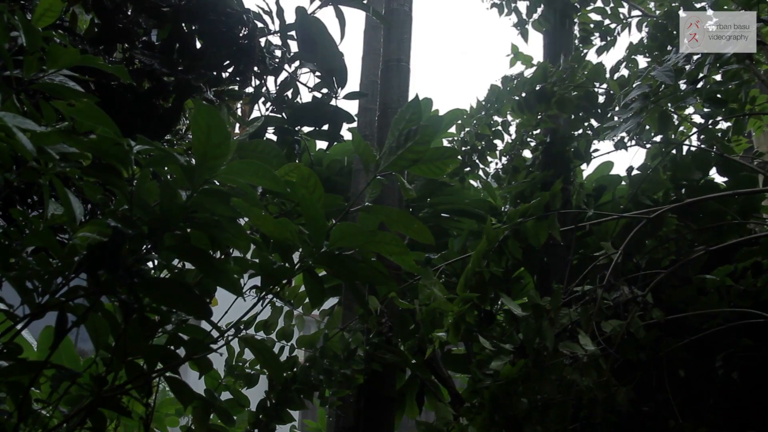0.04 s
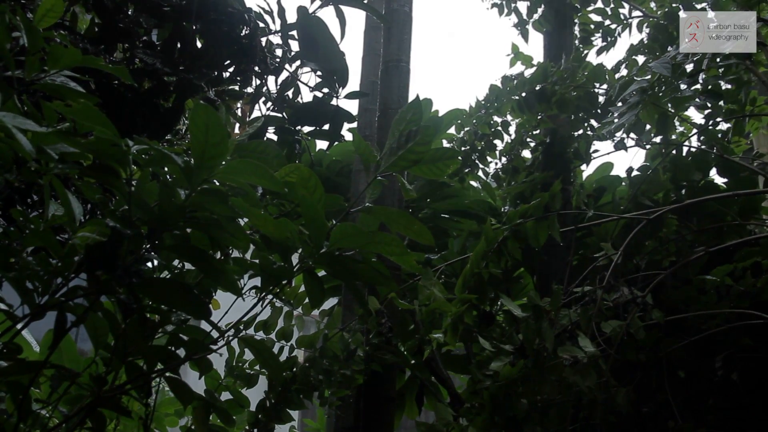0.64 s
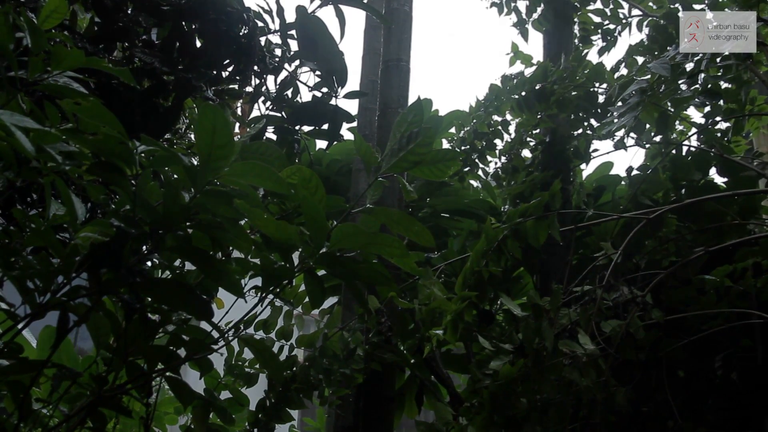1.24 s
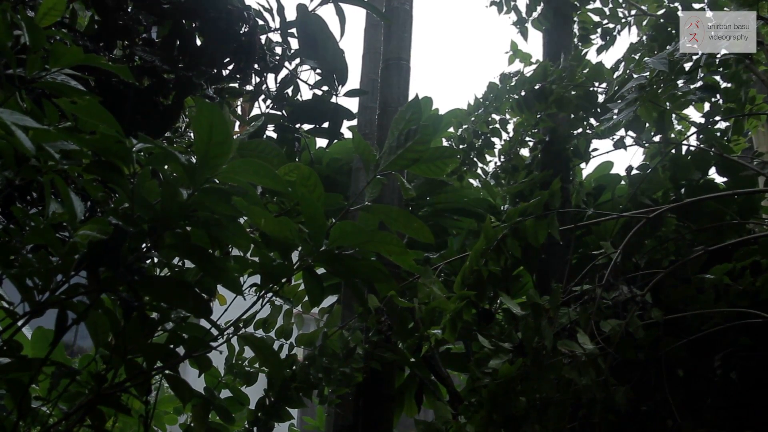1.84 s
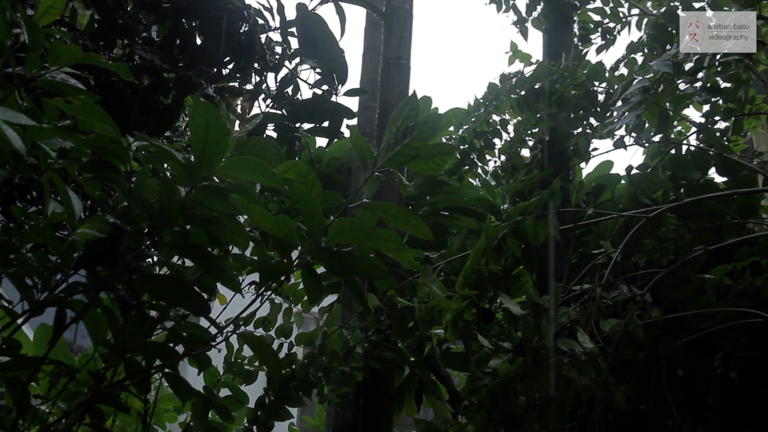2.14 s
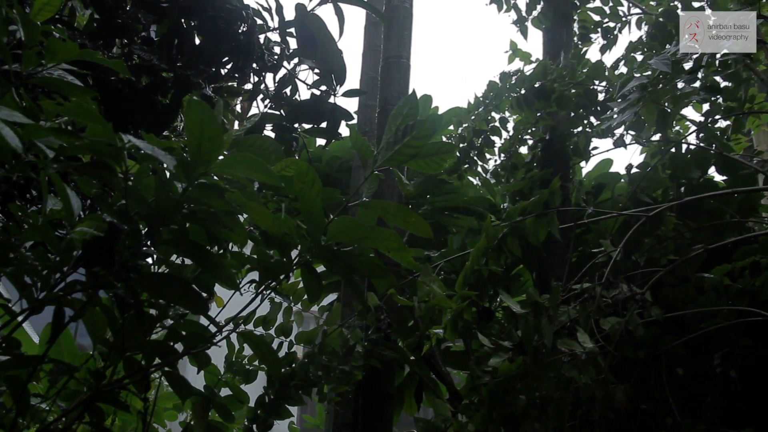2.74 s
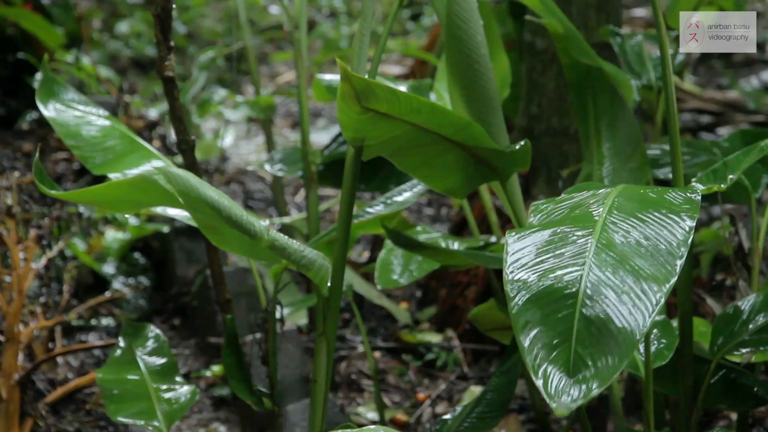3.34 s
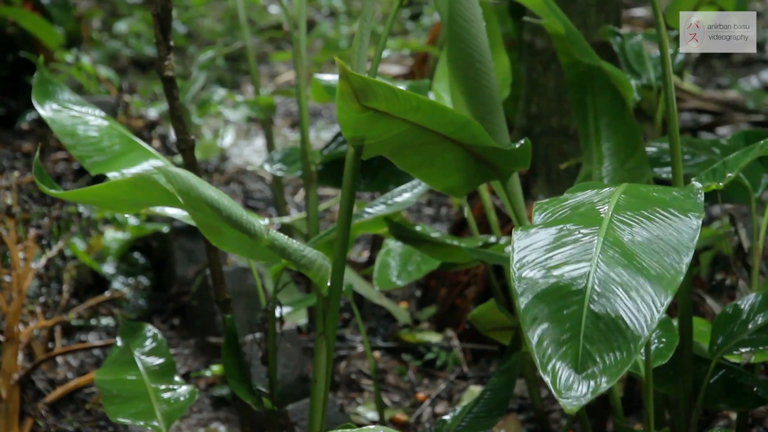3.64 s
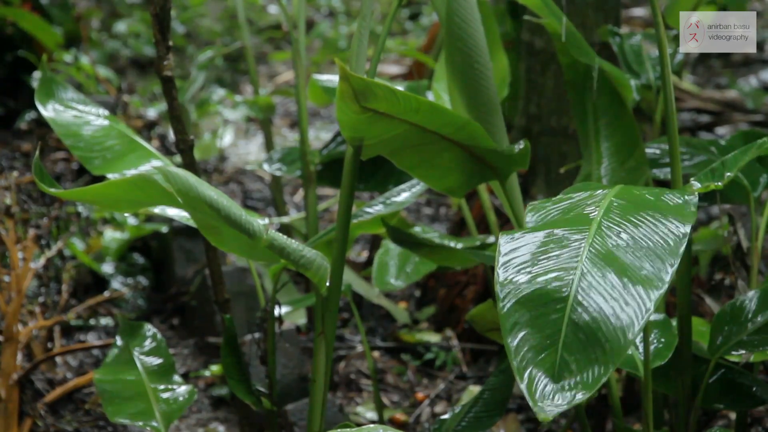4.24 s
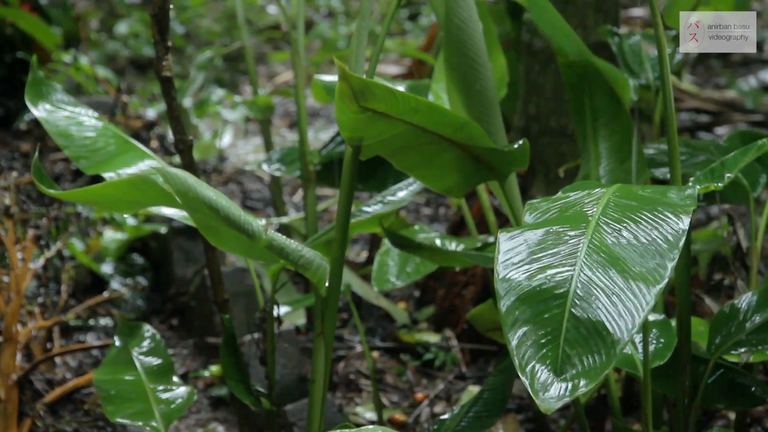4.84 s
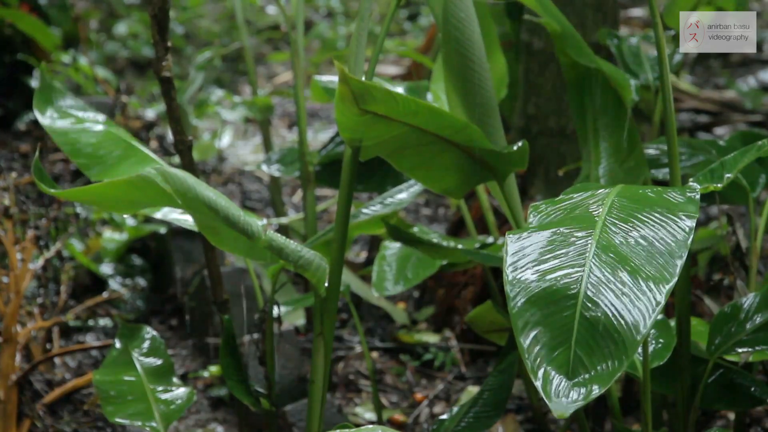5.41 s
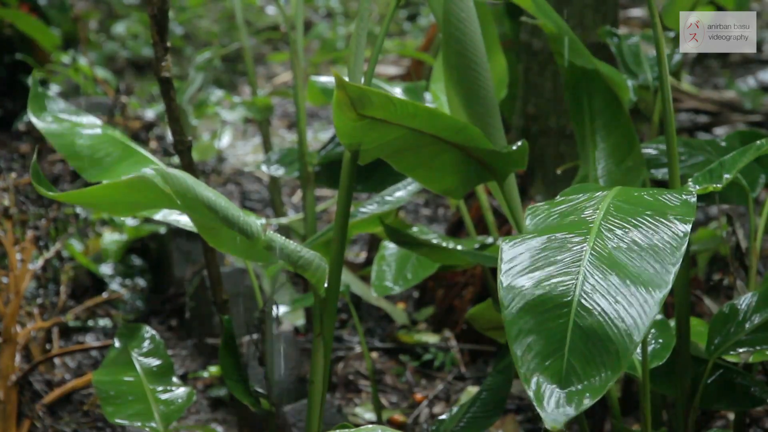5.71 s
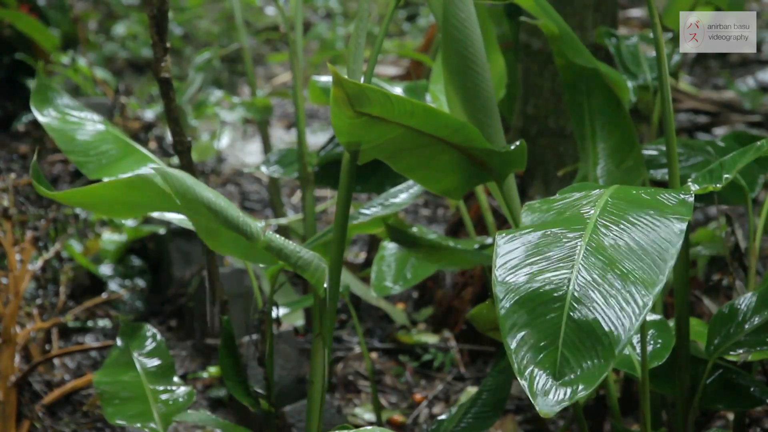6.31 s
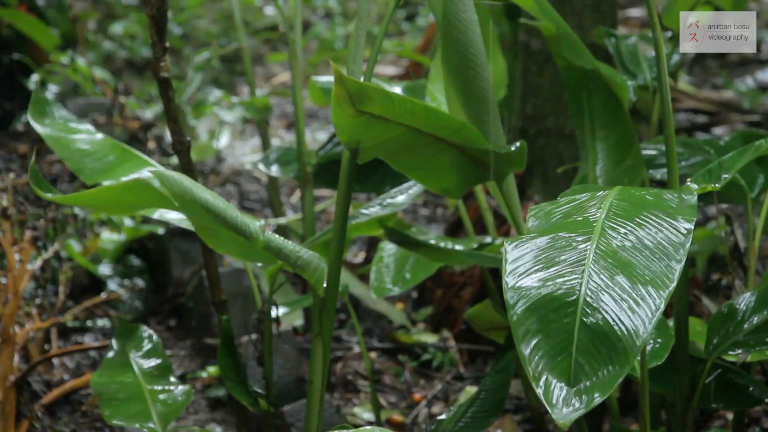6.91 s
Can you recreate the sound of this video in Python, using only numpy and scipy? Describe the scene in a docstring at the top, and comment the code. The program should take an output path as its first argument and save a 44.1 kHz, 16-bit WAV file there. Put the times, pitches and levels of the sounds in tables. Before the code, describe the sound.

Soft, steady rain falls on garden leaves and puddles, with fine patter, tiny plinks and scattered fat drops tapping nearby.

```python
"""A soft wash of steady garden rain, first under trees, then beside a bed of broad leaves and puddles.
Countless far drops merge into the wash; nearer ones patter on leaves, throw fine spray and trap
bubbles that plink. The broad leaves add a hollow drumming, and fat drops from the branches tap
the leaves close by. Late on, the rain grows heavier for a while."""
import sys
import numpy as np
from scipy import signal
from scipy.fft import rfft, irfft
from scipy.io import wavfile

SR = 44100
rng = np.random.default_rng(int(sys.argv[2]) if len(sys.argv) > 2 else 0)


def to_wav(s):
    """Save 16-bit WAV."""
    ch = np.atleast_2d(s).T  # columns
    pcm = np.round(np.clip(ch, -1, 1) * 32767)  # PCM
    wavfile.write(sys.argv[1], SR, pcm.astype(np.int16))


N = 307377
TIME = np.arange(N) / SR

# Tone of the wash in each place. Each row: frequency in Hz, relative spectral density in dB.
TONE_TREES = [(170, -21), (215, -8.5), (273, -8.5), (342, -6), (480, -5), (602, -1.5), (1060, 1.5),
              (1280, 2), (1460, -1.5), (2480, -2), (3110, -6.5), (3900, -5.5), (4800, -10.5), (5700, -12),
              (9500, -19.5), (14100, -26.5), (15500, -31)]
TONE_BED = [(170, -24), (215, -14), (280, -12.5), (413, -6), (528, -3), (637, -8), (770, 0), (1080, -1.5),
            (1230, -2), (1800, -6), (2480, -4), (2900, -6), (3500, -6.5), (4800, -11.5), (6880, -15),
            (13100, -26.5), (15500, -34)]
# How narrow the wash is in each place. Each row: frequency in Hz, left-right likeness from 0 to 1.
LIKENESS_TREES = [(250, 0.87), (700, 0.8), (1300, 0.73), (2000, 0.6), (3500, 0.58), (6500, 0.3),
                  (10000, 0.28), (15000, 0.3)]
LIKENESS_BED = [(250, 0.94), (900, 0.94), (1250, 0.73), (1650, 0.41), (2500, 0.59), (6500, 0.46),
                (10000, 0.08), (15000, 0.12)]
# The wash leans a little left in the treble. Each row: frequency in Hz, left over right in dB.
WASH_PAN = [(300, -0.2), (2700, -0.3), (3300, 2), (4500, -0.5), (6200, 2), (7000, 0.5), (8400, 2),
            (15000, 0)]
# The rain dips briefly where the place changes. Each row: time in seconds, gain in dB.
LEVEL_DIP = [(3.21, 0.36), (3.305, -2), (3.345, 0)]
# Fat drops close by. Each row: start in seconds, level in dB, leaf pitch in Hz, ring length in cycles,
# pan as left over right in dB, droplet rattle relative to the tap in dB.
CLOSE_DROPS = [(0.236, -31, 860, 10, 0, -13), (0.4187, -32, 7950, 12, 3, -13),
               (0.9246, -32, 6000, 5, 1, -16), (1.1353, -31, 1150, 10, -1, -13),
               (2.0415, -29, 4200, 8.9, -2, -12), (2.118, -29, 1700, 9, 1, -9),
               (2.4275, -28, 5170, 6, 3, -11), (2.8889, -25, 1900, 4, 0, -15),
               (2.891, -33, 680, 11, -1, -13), (3.146, -31, 3600, 5.4, 3, -12),
               (3.151, -31, 7750, 7, 1, -15), (3.348, -27, 1130, 9, -2, -9), (3.3525, -29, 790, 8, 0, -8),
               (3.781, -31, 4000, 4.7, 4, -11), (4.16, -30, 4130, 6, 1, -14),
               (4.429, -29, 1650, 10, 1, -13), (4.5703, -25, 4000, 5, 0, -16), (4.61, -30, 860, 12, 0, -12),
               (5.032, -29, 4820, 7, 1, -12), (5.1418, -30, 1050, 12, 1, -11),
               (5.2545, -24, 2400, 5, 1, -16), (5.302, -28, 1030, 9, 1, -14),
               (5.4615, -27, 2930, 7, 1, -12), (5.5285, -28, 7400, 6, 0, -14),
               (5.849, -29, 925, 14, 0, -11), (5.9737, -28, 3500, 6, 4, -14), (6.314, -38, 363, 7, 1, -10),
               (6.5953, -29, 1550, 6, 0, -15), (6.607, -25.5, 2350, 10, 2, -13),
               (6.616, -29, 1400, 8, 0, -11), (6.621, -23, 2050, 10, 1, -15),
               (6.6264, -20, 1850, 10, 2, -17), (6.719, -32, 790, 12, 2, -9),
               (6.754, -32, 1050, 12, 0, -10), (6.812, -33, 380, 7, -1, -11),
               (6.814, -29.5, 850, 11, 0, -10), (6.919, -22.5, 3600, 3.5, 2, -17),
               (6.92, -25, 1180, 4.7, -2, -10)]

MOVE_S, MOVE_WIDTH_S = 3.33, 0.016   # crossfade from the trees to the bed of broad leaves
RAIN_DB, SPELL_DB = -41, 1.8
SPELL_START_S, SPELL_BUILD_S, SPELL_HOLD_S, SPELL_EASE_DB_PER_S = 4, 0.8, 1, 1.05
TREBLE_DB, TREBLE_FOLLOWS = 1, 0.22   # treble lift in steady rain; further dB per dB of heavier rain
RAIN_EDGE_HZ = 252.4   # the rain is cut off steeply below this
LOW_CUT_HZ, HIGH_CUT_HZ = 188, 15700
LEFT_LEAD_S, DC_OFFSET = 2.3e-5, (-.0427, .0584)


def from_db(db):
    """Decibels to gain."""
    return 10 ** (np.asarray(db) / 20)


def rms_one(x):
    """Scale to an rms of 1."""
    return x / np.sqrt(np.mean(x ** 2) + 1e-20)


def at_hz(curve, hz):
    """Read a curve on a log-frequency axis."""
    freqs, values = np.transpose(curve)
    return np.interp(np.log(hz), np.log(freqs), values)


def panned(x, pan_db):
    """Place a sound in the stereo field; positive is left."""
    return x * from_db(pan_db * np.array([[.5], [-.5]]))


def low_cut(x, edge_hz, order):
    """Steep high-pass."""
    return signal.sosfilt(signal.butter(order, edge_hz, "high", fs=SR, output="sos"), x)


def drift(rate_hz):
    """Smooth random modulation with a spread of 1."""
    hop, settle = 40, 2000
    pole = np.exp(-2 * np.pi * rate_hz * hop / SR)
    noise = rng.standard_normal(N // hop + settle + 2)
    slow = signal.lfilter([1], [1, -2 * pole, pole * pole], noise)[settle:]
    return np.interp(np.arange(N) / hop, np.arange(len(slow)), rms_one(slow))


def impacts(per_s, spread_db):
    """Clicks at random moments, many small and few large."""
    at = np.flatnonzero(rng.random(N) < per_s / SR)
    sizes = from_db(spread_db * np.minimum(rng.exponential(1, len(at)), 3))
    clicks = np.zeros(N)
    clicks[at] = sizes * rng.choice([-1, 1], len(at))
    return clicks


def ring(clicks, hz, cycles):
    """A click sets a wet leaf or a bubble ringing; it dies by 60 dB over the given cycles."""
    angle = 2 * np.pi * hz / SR
    pole = np.exp(-np.log(1000) * hz / (cycles * SR))
    return signal.lfilter([1, 0, -1], [1, -2 * pole * np.cos(angle), pole * pole], clicks + 1e-18) / 2


def air_rumble(level_db, top_hz):
    """A very faint low rumble of outdoor air."""
    lowpass = signal.butter(2, top_hz, fs=SR, output="sos")
    return from_db(level_db) * rms_one(signal.sosfilt(lowpass, rng.standard_normal((2, N))))


def low_blips(per_s, blip_hz, length_s, spread_db):
    """Faint, soft low blips at random moments, a few rounded cycles each."""
    age = TIME[:int(length_s * SR)]
    blip = np.sin(np.pi * age / length_s) ** 2 * np.sin(2 * np.pi * blip_hz * age)
    return rms_one(signal.fftconvolve(impacts(per_s, spread_db), blip)[:N])


def far_wash(in_bed, bright_db, flicker_db, flurry_db, flicker_hz, flurry_hz):
    """Far drops merge into flickering bands of noise whose tone and width follow the place."""
    edges = np.geomspace(150, 17000, 29)
    centres = np.sqrt(edges[1:] * edges[:-1])
    trees, bed = (from_db(at_hz(t, centres)) * np.sqrt(np.diff(edges)) for t in (TONE_TREES, TONE_BED))
    trees, bed = trees / np.linalg.norm(trees), bed / np.linalg.norm(bed)
    white = rng.standard_normal((2, 2, N))
    lift_db = bright_db + flurry_db * drift(flurry_hz)   # flurries of splashes lift the whole treble
    out = 0
    for k, hz in enumerate(centres):
        band = signal.butter(2, edges[k:k + 2], "band", fs=SR, output="sos")
        mid, side = rms_one(signal.sosfilt(band, white[k % 2]))
        alike = at_hz(LIKENESS_TREES, hz) * (1 - in_bed) + at_hz(LIKENESS_BED, hz) * in_bed
        width = np.sqrt((1 - alike) / (1 + alike))
        treble = hz ** 2 / (hz ** 2 + 3500 ** 2)
        wander = from_db(treble * lift_db + flicker_db * drift(flicker_hz))
        gain = (trees[k] * (1 - in_bed) + bed[k] * in_bed) * wander
        out += gain * panned(mid + width * side * [[1], [-1]], at_hz(WASH_PAN, hz))
    return out


def patter(per_s, band_hz, spots, cycles, spread_db, db_per_octave, width_db):
    """Nearer drops, dealt to ringing spots of many pitches and directions; rms 1."""
    out = 0
    for k, hz in enumerate(np.geomspace(*band_hz, spots)):
        spot = rms_one(ring(impacts(per_s / spots, spread_db), hz, cycles))
        tilt = from_db(db_per_octave * np.log2(hz / band_hz[0]))
        out += panned(spot * tilt, width_db * rng.random() * (-1) ** k)
    return rms_one(out)


def fine_spray():
    """Splashes throw tiny droplets that land as short, bright ticks."""
    return patter(1500, (3980, 11200), spots=10, cycles=6.5, spread_db=5, db_per_octave=-5, width_db=2)


def puddle_plinks():
    """Bubbles trapped in the puddles ring on as tiny plinks."""
    return patter(260, (1301, 4864), spots=36, cycles=87, spread_db=2, db_per_octave=-3.5, width_db=10)


def leaf_patter():
    """Drops strike wet leaves, which ring briefly in the midrange."""
    return patter(1000, (604, 3790), spots=18, cycles=15, spread_db=2.5, db_per_octave=-1, width_db=4.5)


def leaf_drumming(surge_db, surge_hz):
    """Broad leaves straight ahead ring low and hollow as the dripping comes in small surges."""
    surge = from_db(surge_db * drift(surge_hz))
    drum = patter(300, (850, 1178), spots=9, cycles=26, spread_db=0.4, db_per_octave=1, width_db=-1)
    return surge * drum


def fat_drops(rattle_decay_s):
    """Each taps a leaf, then its scattered droplets rattle on the same leaf for an instant."""
    out, age = np.zeros((2, N)), TIME[:SR // 10]
    for start_s, level_db, hz, cycles, pan_db, rattle_db in CLOSE_DROPS:
        droplets = rng.standard_normal(len(age)) * np.exp(-age / rattle_decay_s)
        push = from_db(rattle_db) * np.sqrt(hz / SR) * droplets
        push[0] = 1   # the tap itself
        leaf = from_db(level_db) * ring(push, hz, cycles)
        at = round(start_s * SR)
        out[:, at:at + len(age)] += panned(leaf, pan_db)[:, :N - at]
    return out


def heavier_spell():
    """The rain builds, holds and eases off: dB above its steady strength at every sample."""
    age = TIME - SPELL_START_S
    build = SPELL_DB * np.clip(age / SPELL_BUILD_S, 0, 1)
    ease = SPELL_EASE_DB_PER_S * np.maximum(age - SPELL_BUILD_S - SPELL_HOLD_S, 0)
    return np.maximum(build - ease, 0)


def scene():
    """Wash, patter, spray and plinks swell together; drumming, blips and fat drops go their own way."""
    spell_db = heavier_spell()
    bright_db = TREBLE_DB + TREBLE_FOLLOWS * spell_db   # harder rain splashes more
    dip_db = np.interp(TIME, *np.transpose(LEVEL_DIP))
    in_bed = .5 + .5 * np.tanh((TIME - MOVE_S) / MOVE_WIDTH_S)   # 0 under the trees, 1 by the bed
    wash = far_wash(in_bed, bright_db, flicker_db=0.83, flurry_db=0.5, flicker_hz=18, flurry_hz=22)
    leaves = from_db(-9.5) * leaf_patter()
    spray = from_db(-20 + bright_db) * fine_spray()
    plinks = from_db(-12) * puddle_plinks()
    drumming = from_db(-8) * in_bed * leaf_drumming(surge_db=0.7, surge_hz=2.8)
    blips = from_db(-32.5) * low_blips(per_s=6.5, blip_hz=205, length_s=0.026, spread_db=2)
    rain = from_db(spell_db) * (from_db(-0.2) * wash + leaves + spray + plinks) + drumming
    rain = low_cut(rain, RAIN_EDGE_HZ, order=20)
    return from_db(RAIN_DB + dip_db) * (rain + blips) + fat_drops(rattle_decay_s=0.019)


def record(dry):
    """The left mic hears a touch early; bass thins to a rumble, the top is cut, both sides rest off zero."""
    delay = np.exp(-2j * np.pi * np.fft.rfftfreq(N, 1 / SR) * LEFT_LEAD_S)
    right = irfft(rfft(dry[1]) * delay, N)
    thin = low_cut(np.array([dry[0], right]), LOW_CUT_HZ, order=12)
    heard = thin + air_rumble(level_db=-83.5, top_hz=58.5)
    high_cut = signal.ellip(12, .1, 80, HIGH_CUT_HZ, fs=SR, output="sos")
    return signal.sosfilt(high_cut, heard) + np.array(DC_OFFSET)[:, None]


dry = scene()
out = record(dry)
to_wav(out)
```